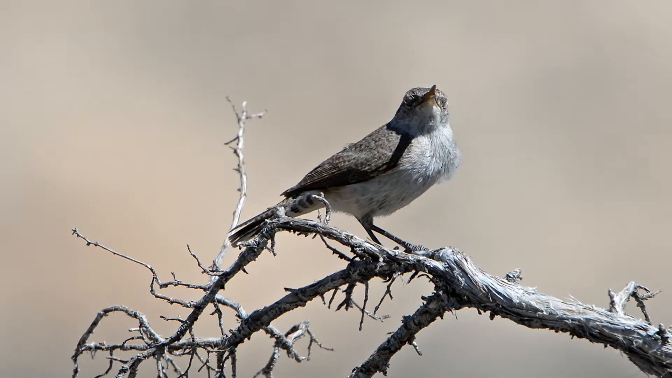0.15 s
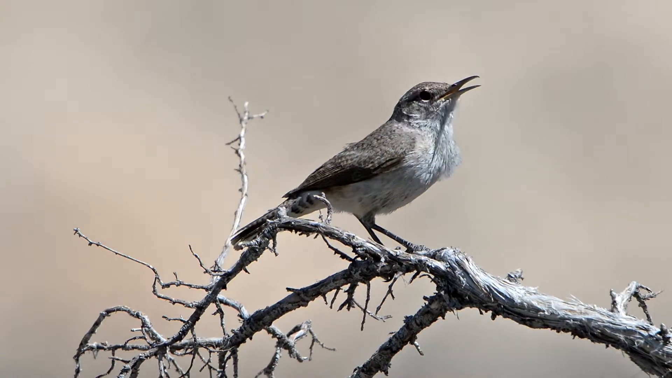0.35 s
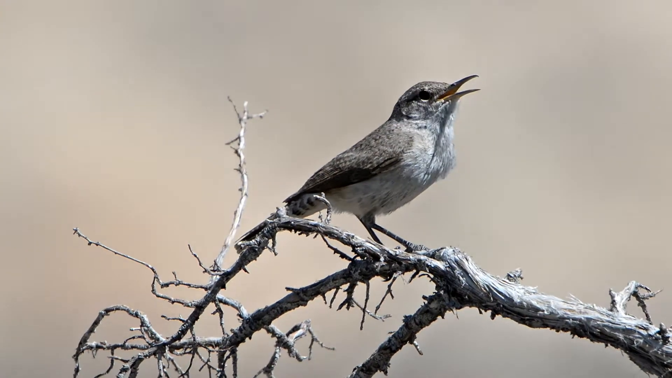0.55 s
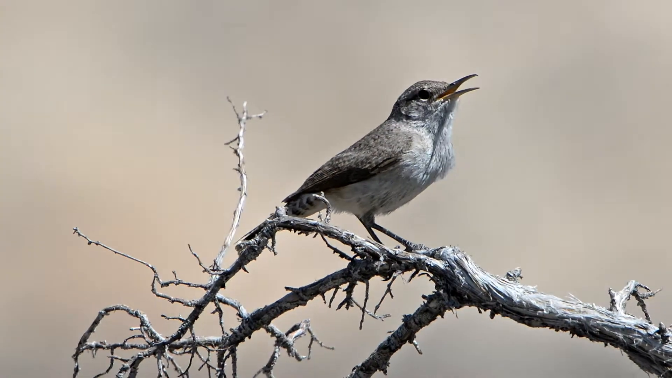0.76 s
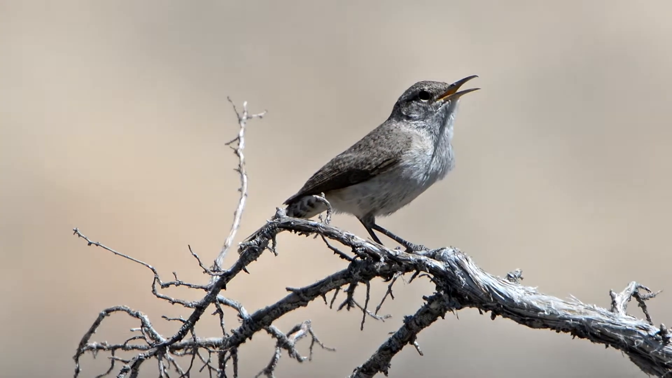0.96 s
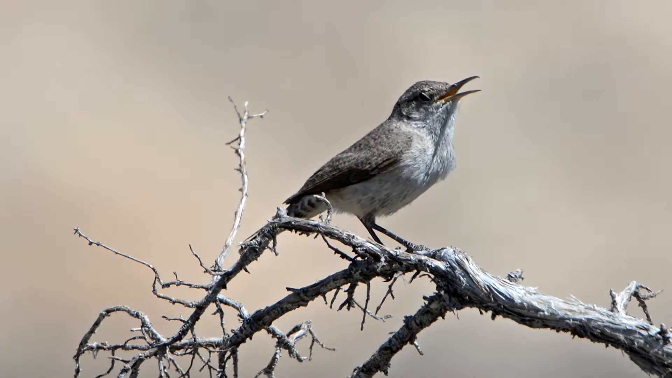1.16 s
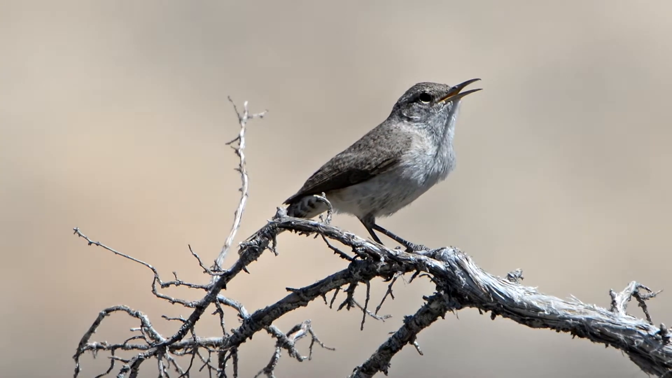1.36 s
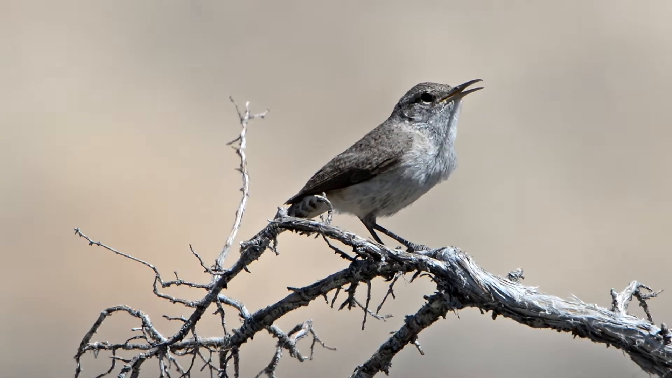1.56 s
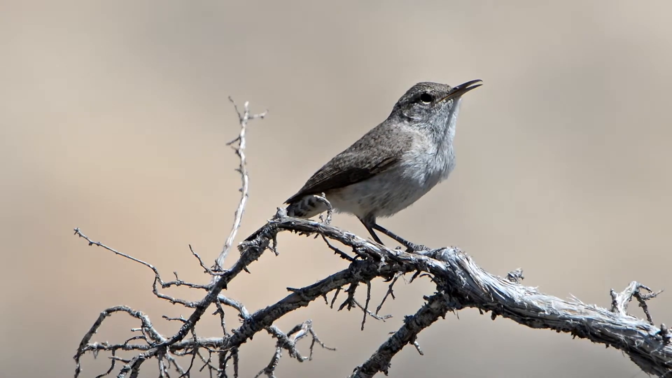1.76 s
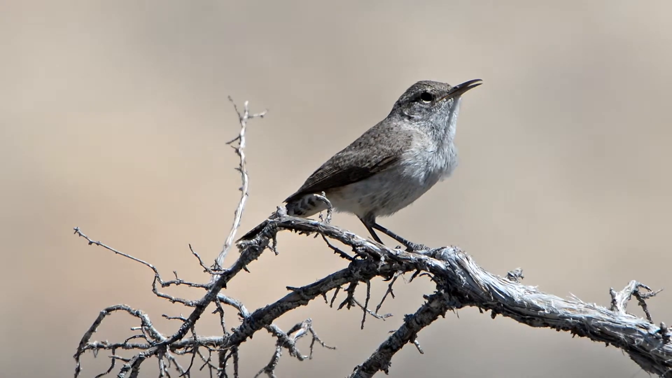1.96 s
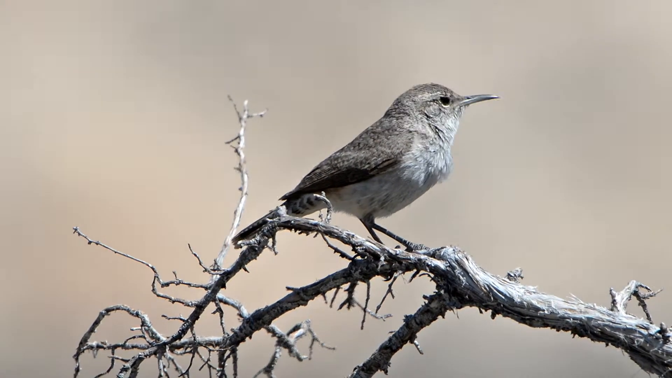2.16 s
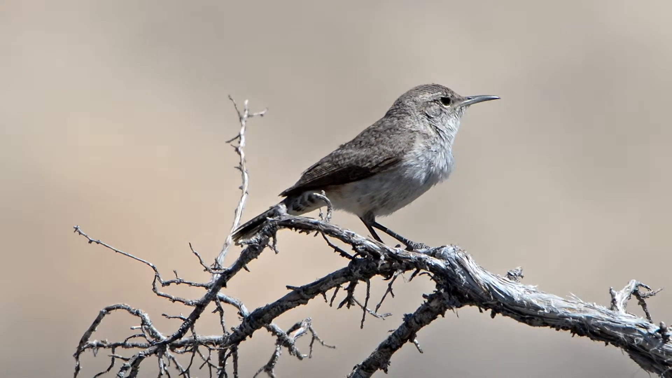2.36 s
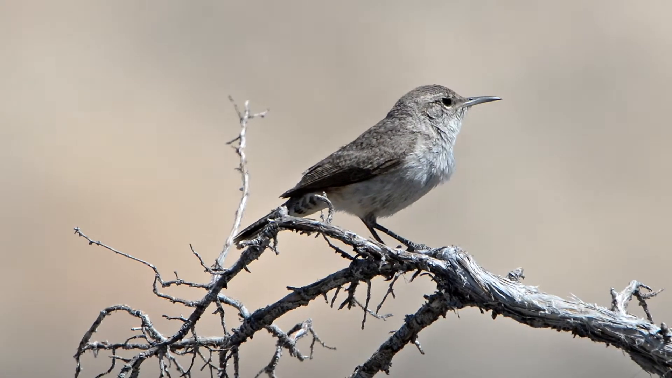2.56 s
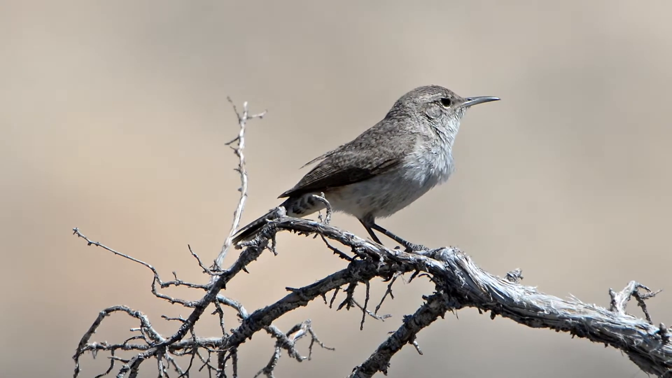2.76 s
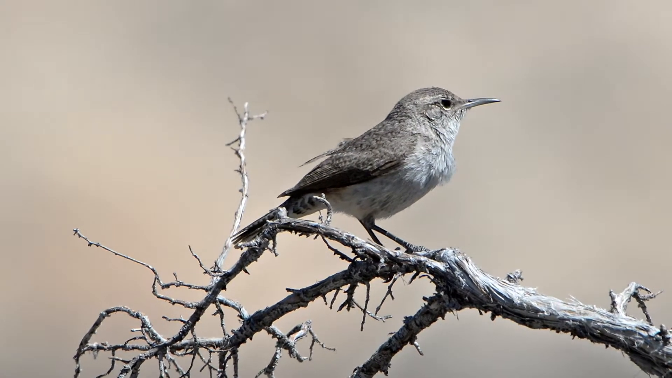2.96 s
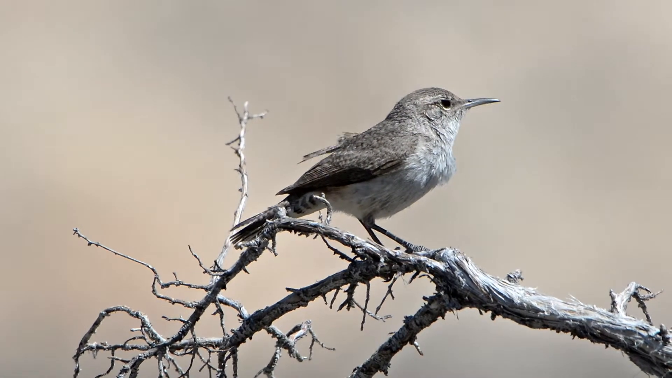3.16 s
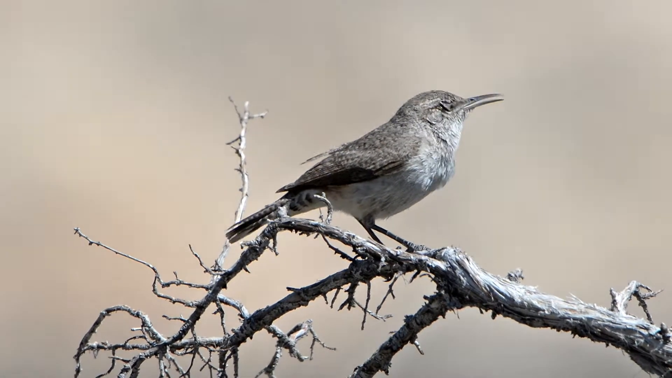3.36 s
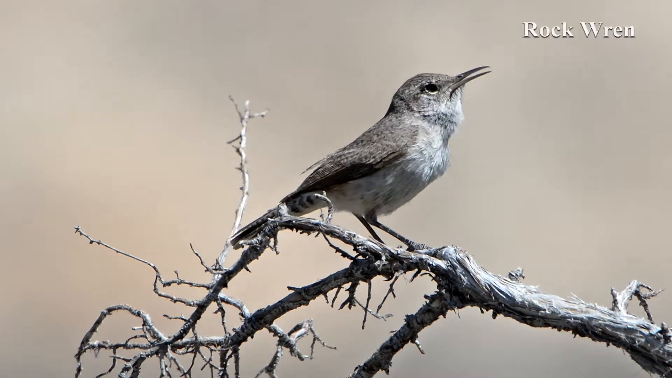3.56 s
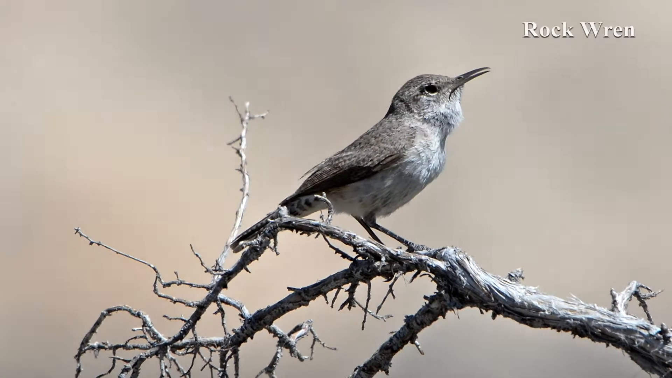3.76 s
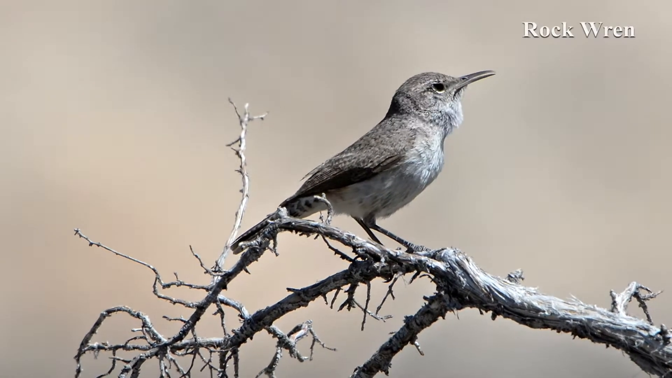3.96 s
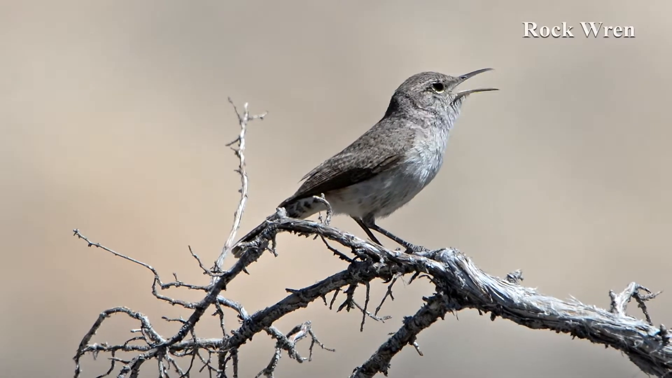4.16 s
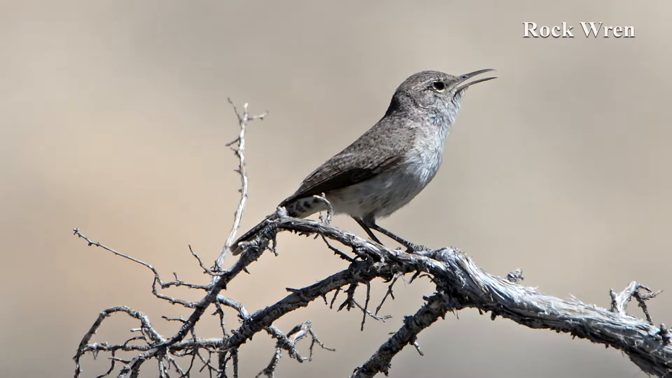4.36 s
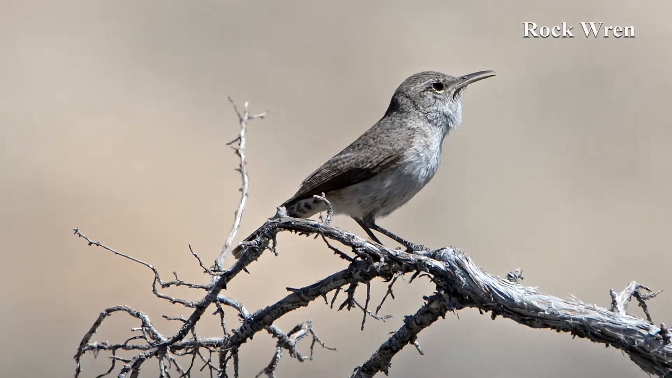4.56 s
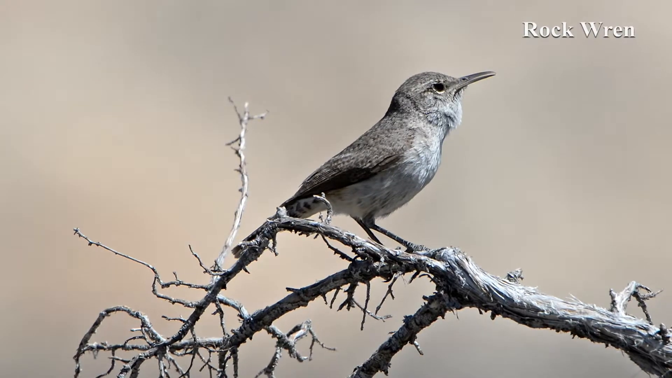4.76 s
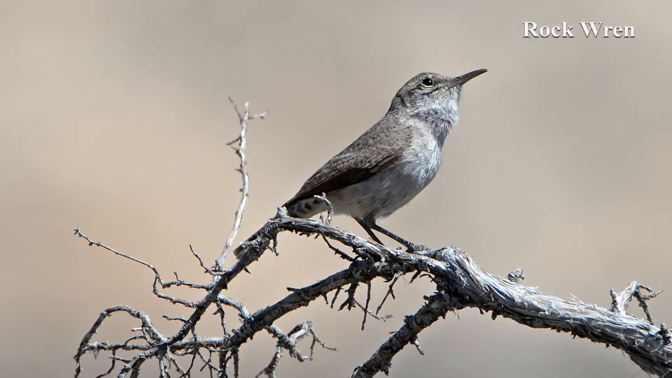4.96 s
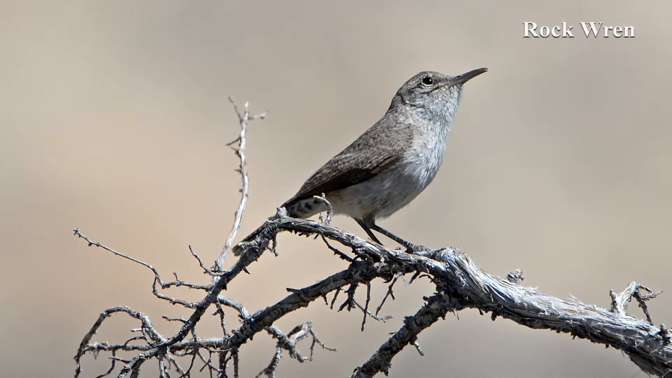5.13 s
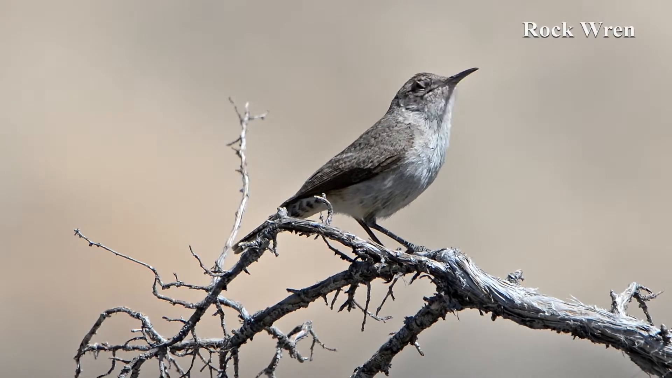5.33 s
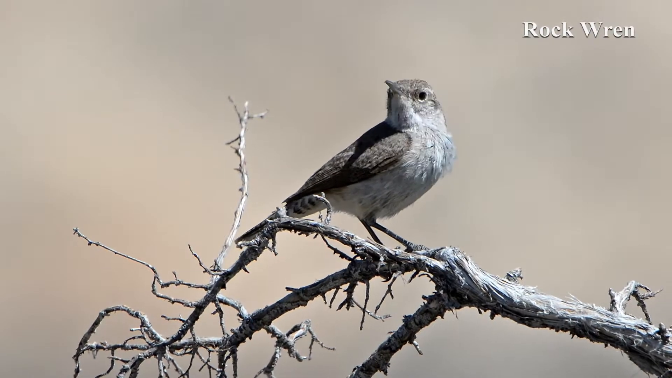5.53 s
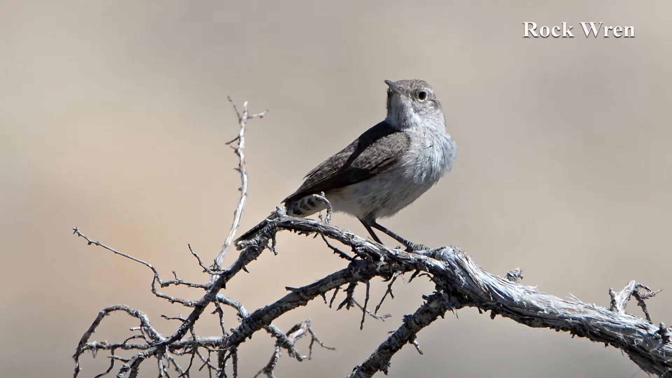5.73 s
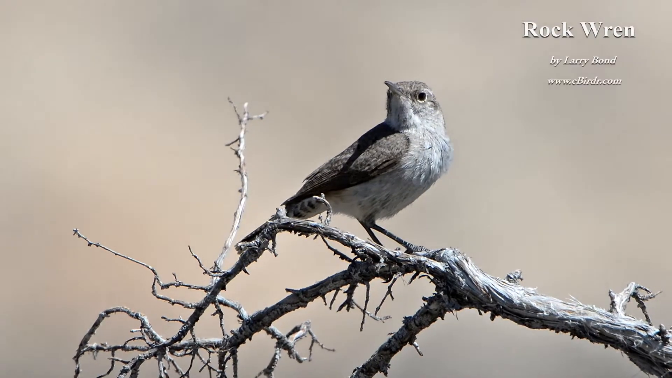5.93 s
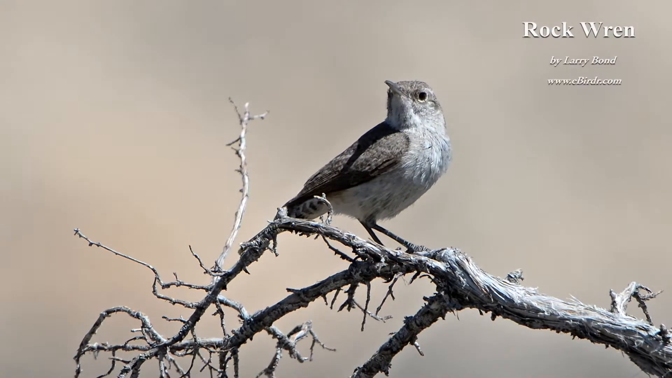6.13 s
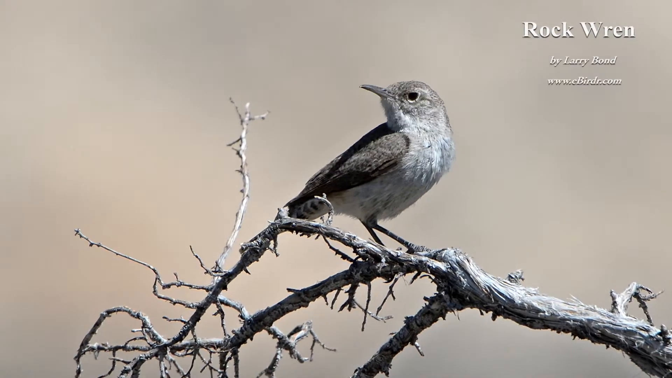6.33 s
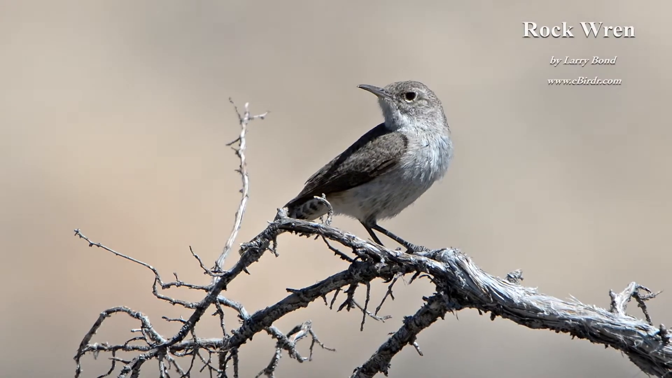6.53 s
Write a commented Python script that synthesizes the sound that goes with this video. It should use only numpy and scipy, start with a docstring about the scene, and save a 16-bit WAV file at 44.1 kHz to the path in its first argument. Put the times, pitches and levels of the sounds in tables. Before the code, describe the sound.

Close birdsong in dry open country: quick ringing trills, a short pause, then evenly spaced hoarse chips with soft whistled endings, over thin hiss.

```python
"""Over hiss, a thin whine and a breeze, a rock wren at once sings eight two-voiced trills joined by high slurs.
Its second song is seven sharp chips, each buzzing into a low whistle; a single faint peep comes from far off.
Notes are gliding phases shaped in dB, with level-dependent overtones; a filtered noise tail is the ground's echo.
Breeze, drone and hiss are coloured noise; the recorder adds a sine whine, cuts the bass and the extreme top."""
import sys
import numpy as np
from scipy import signal
from scipy.fft import rfft, irfft, next_fast_len
from scipy.io import wavfile
from scipy.ndimage import uniform_filter1d

SR = 44100
rng = np.random.default_rng(int(sys.argv[2]) if len(sys.argv) > 2 else 0)


def int16_out(signal):
    """Quantize to a 16-bit WAV file."""
    q = np.round(np.clip(np.atleast_2d(signal).T, -1, 1) * 32767)
    wavfile.write(sys.argv[1], SR, q.astype(np.int16))


N = 295029
TIME = np.arange(N) / SR


def wren():
    """Both songs of one syrinx, summed note by note."""
    song = np.zeros(N)
    for i, x in trill_song() + chip_song():
        song[i] += x
    return song


# Trills: first_beat_s, beat_s, level_db (relative, at beat 3), fade_db_per_beat, overtones_db (relative),
# trough_hz (at beat 1.75), attack_db, release_db
TRILL_NOTES = [(0.267, 0.022, -5, -1.74, 8.5, 4310, 9, 6.5), (0.4896, 0.023, -1, -0.3, 4, 4350, 10.5, 14),
               (0.7146, .024, .5, -0.3, 4.5, 4400, 8, 14), (0.9447, 0.025, 0, 0, 7, 4416, 5.5, 11),
               (1.178, .024, 1, 0.15, 3.2, 4480, 8, 15), (1.407, .024, -2.5, -0.4, 5, 4430, 5.5, 18),
               (1.648, 0.024, -7.5, -0.56, 4.5, 4470, 8.5, 9.5), (1.905, 0.023, -9, 0, 5.5, 4390, 11, 9)]
# High slurs between trills: start_s, length_s, vertex_hz, bend_hz (per length squared),
# vertex_at (share of length; above 1 = never reached), level_db
SLUR_NOTES = [(.400, 0.043, 6190, 1450, .78, -26), (0.627, 0.04, 6010, 2140, 0.71, -22),
              (.853, .043, 5890, 584, 1.2, -23.5), (1.086, 0.044, 6090, 3020, 0.65, -21.5),
              (1.31, 0.051, 5990, 430, 1.3, -24.5), (1.538, 0.057, 6100, 780, 1.25, -34),
              (1.79, 0.04, 6090, 1580, .86, -29.5)]


def trill_song():
    """First song: two-voiced trills and the slurs between them."""
    return [trill(*row) for row in TRILL_NOTES] + [slur(*row) for row in SLUR_NOTES]


TRILL_BEATS, HURRY_FROM_BEAT, HURRY_SHARE = 5.08, 3.9, 0.24


def trill(start_s, beat_s, db, fade_db, bright_db, trough_hz, attack_db, release_db, lead_beats=0.06):
    """Both sides of the syrinx at once; effort builds around the first beat and ebbs as the last beats hurry."""
    i, t, gate = span(start_s - 0.38 * beat_s, start_s + TRILL_BEATS * beat_s, edge_s=0.0055)
    at = (t - start_s) / beat_s
    effort_db = envelope(np.linspace(0, 1, len(t)), top_from=0.27, top_to=0.63,
                         rise_db=attack_db, fall_db=release_db, rise_curve=1.1, fall_curve=2.8)
    hurry = HURRY_SHARE * np.maximum(at - HURRY_FROM_BEAT, 0)
    early = lead_beats * np.clip(1 - 2 * at, 0, 1)
    at = at + hurry + early
    z = 0
    for hz, gain in swoops(at, trough_hz), strokes(at):
        hz = hz * (1 + 0.0156 * walk(89.3, len(t)))
        flicker_db = 0.61 * walk(119.4, len(t)) + 1.0 * walk(900, len(t))
        z = z + gain * undb(flicker_db) * np.exp(1j * swing(hz, jitter=0.01))
    z = z * gate * undb(effort_db + fade_db * (at - 3))
    return i, undb(db) * overtones(z, even_db=bright_db - 24.0, odd_db=bright_db - 23)


# Places are shares of the beat
SWOOP_TOP_HZ, SWOOP_TOP_AT, SWOOP_BREAK_AT, SWOOP_SHARPNESS, SWOOP_DB = 7015, 0.29, 0.41, 1.45, -19
TROUGH_CLIMB_HZ_PER_BEAT, FIRST_TROUGH_LIFT_HZ = 128.2, 664


def swoops(at, trough_hz):
    """High side: pitch arches once a beat; the tone swells through the trough and breaks just after the top."""
    arch = np.abs(np.cos(np.pi * (at - SWOOP_TOP_AT))) ** (2 * SWOOP_SHARPNESS)
    first_lift_hz = FIRST_TROUGH_LIFT_HZ * np.clip(1 - at / 0.574, 0, 1)
    low_hz = trough_hz + TROUGH_CLIMB_HZ_PER_BEAT * (at - 1.75) + first_lift_hz
    db = envelope((at - SWOOP_BREAK_AT) % 1, top_from=0.5, top_to=0.61,
                  rise_db=17.5, fall_db=31, rise_curve=3.36, fall_curve=1.19)
    return low_hz + (SWOOP_TOP_HZ - low_hz) * arch, undb(SWOOP_DB + db)


# Lead and length are shares of the beat
STROKE_FROM_HZ, STROKE_RISE_HZ, STROKE_LEAD, STROKE_LENGTH, STROKE_DB = 3330, 1668, 0.038, 0.48, -17


def strokes(at, crest=0.75, last_db=-7, skew=1.24):
    """Low side: a short rising stroke at the start of each beat, weaker on the last one."""
    p = np.clip((at + STROKE_LEAD) % 1 / STROKE_LENGTH, 0, 1)
    level_db = STROKE_DB + last_db * np.clip(at - HURRY_FROM_BEAT, 0, 1)
    gain = np.abs(np.sin(np.pi * p ** skew)) ** 1.08 * undb(level_db)
    return STROKE_FROM_HZ + STROKE_RISE_HZ * np.sin(np.pi / 2 * p / crest), gain


def slur(start_s, length_s, vertex_hz, bend_hz, vertex_at, db, loudest=0.7, octave_db=-29):
    """A thin high note on a parabolic pitch curve, with a faint octave."""
    i, t, gate = span(start_s, start_s + length_s, edge_s=0.0033)
    p = (t - start_s) / length_s
    phase = pure_phase(vertex_hz + bend_hz * (p - vertex_at) ** 2)
    swell_db = envelope(p, loudest, loudest, rise_db=22.5, fall_db=15, rise_curve=2.4, fall_curve=2.1)
    swell = gate * undb(0.29 * walk(200, len(t)) + swell_db)
    octave = undb(octave_db) * swell ** 0.5
    return i, undb(db) * (swell * np.sin(phase) + octave * np.sin(2 * phase))


# Chips: pitch_peak_s, level_db (relative), rise_s, buzz_level_db (of the buzz that follows)
CHIP_NOTES = [(3.522, -5.5, 0.034, -42.5), (3.7738, -.5, 0.032, -34.5), (4.021, 0, 0.036, -38.5),
              (4.272, .5, 0.039, -33), (4.484, .6, .039, -33.5), (4.734, 1.5, 0.036, -32.5),
              (4.984, 0.5, 0.036, -34.5)]
# Low whistles, one after each chip: start_s, length_s, pitch_hz (before scoop and fall), fall_hz,
# fall_lateness (power), level_db
WHISTLE_NOTES = [(3.616, 0.077, 2850, 674, 5.6, -25), (3.874, 0.074, 2936, 530, 5.2, -20),
                 (4.117, 0.078, 2946, 536, 2.7, -20), (4.369, 0.062, 2885, 412, 4.6, -17.5),
                 (4.59, 0.063, 2980, 548, 2.5, -18), (4.831, 0.076, 2886, 615, 2.83, -22),
                 (5.084, 0.079, 2866, 512, 2.1, -26.5)]
SCOOP_HZ, BUZZ_PULSE_HZ = 117.6, 130.3


def chip_song():
    """Second song: each chip buzzes into its whistle."""
    notes = [whistle(*row) for row in WHISTLE_NOTES]
    for (peak_s, db, rise_s, buzz_db), (start_s, _, top_hz, *_) in zip(CHIP_NOTES, WHISTLE_NOTES):
        notes.append(chip(peak_s, db, rise_s))
        notes.append(buzz(peak_s + 0.012, start_s + 0.002, top_hz - SCOOP_HZ, buzz_db))
    return notes


# Pitch: a ramp to a shoulder, a quick flick on top of it, then a sag
CHIP_FROM_HZ, CHIP_SHOULDER_HZ, CHIP_CLIMB_HZ_PER_S, CHIP_SAG_HZ_PER_S = 1770, 2877, 46000, 18900
FLICK_HZ, FLICK_UP_S, FLICK_DOWN_S, CHIP_TAIL_S = 941, 0.00386, 0.0050, 0.023
# Relative levels: first three harmonics, extra push of the flick, rasp
CHIP_HARMONICS_DB, FLICK_DB, RASP_DB = (-21, -22.5, -34), 7, -41.5
# Throat resonance: freq_hz, gain_db
THROAT_RESONANCE = [(1750, -22.5), (2400, -16.5), (3000, -4.5), (3800, -2.5), (4850, -2), (5600, -11),
                    (7000, -11.5), (11500, -48)]
# Rasp spectrum: freq_hz, density_db (relative, per Hz)
RASP_SPECTRUM = [(2500, -30), (3300, -13), (3800, 0.5), (5200, -1), (6500, -18), (8000, -21), (15000, -19)]


def chip(peak_s, db, rise_s, onset_db=24, release_db=15, purity_db=-8, dulling_db=-20):
    """A fast rise and fall, hoarse at both ends; the throat favours harmonics near 3-5 kHz."""
    i, t, gate = span(peak_s - rise_s, peak_s + CHIP_TAIL_S)
    before, after = np.maximum(peak_s - t, 0), np.maximum(t - peak_s, 0)
    flick = np.exp(-(before / FLICK_UP_S + after / FLICK_DOWN_S) ** 2)
    ramp_hz = CHIP_SHOULDER_HZ - CHIP_CLIMB_HZ_PER_S * before - CHIP_SAG_HZ_PER_S * after
    hz = np.maximum(ramp_hz, CHIP_FROM_HZ) + FLICK_HZ * flick
    onset = np.clip(1 - (1 - before / rise_s) / 0.47, 0, 1) ** 0.95
    effort_db = -onset_db * onset - release_db * (after / CHIP_TAIL_S) ** 3.3
    hoarse = np.clip(np.abs(t - peak_s + 0.004) / 0.03, 0, 1) ** 3.5
    phase = swing(hz * (1 + 0.014 * walk(133, len(t))), jitter=0.0041 + 0.045 * hoarse)
    # the flick pushes the fundamental; from there on the tone is purer and its overtones die first
    pure_db = purity_db * np.where(t < peak_s, flick, 1)
    throat_hz, throat_db = np.transpose(THROAT_RESONANCE)
    z = 0
    for k, harmonic_db in enumerate(CHIP_HARMONICS_DB, 1):
        push_db = FLICK_DB * flick if k == 1 else pure_db + dulling_db * after / CHIP_TAIL_S
        level_db = db + effort_db + harmonic_db + push_db + np.interp(k * hz, throat_hz, throat_db)
        z = z + undb(level_db + walk(373, len(t))) * np.exp(1j * k * phase)
    rasp = undb(db + RASP_DB + 0.35 * effort_db + 1.2 * pure_db) * noise(RASP_SPECTRUM)[i]
    return i, gate * (overtones(z, even_db=-49, odd_db=-27) + rasp)


def buzz(start_s, end_s, end_hz, db, sweep_hz=600):
    """Soft rapid pulses, each sweeping upward, that run into the whistle."""
    i, t, gate = span(start_s, end_s)
    pulse_hz = BUZZ_PULSE_HZ * (1 + 0.11 * walk(90, len(t)))
    share = np.cumsum(pulse_hz) / SR % 1
    progress = (t - start_s) / (end_s - start_s)
    hz = end_hz - 250 * (1 - progress) ** 2 + sweep_hz * (share - 0.5)
    swell_db = db - 8 * np.clip(1 - 2 * progress, 0, 1) + 1.7 * walk(106, len(t))
    pulses = np.sin(np.pi * share) ** 4
    return i, gate * undb(swell_db) * pulses * np.sin(swing(hz, jitter=0.015))


def whistle(start_s, length_s, top_hz, fall_hz, lateness, db,
            loudest=0.65, octave_db=-34, opening_db=32, flutter=0.25):
    """A pure low note that swells as the buzz's flutter dies out; its octave emerges towards the loudest point."""
    i, t, gate = span(start_s, start_s + length_s, edge_s=0.0037)
    p = (t - start_s) / length_s
    hz = top_hz - SCOOP_HZ * (1 - p) ** 2 - fall_hz * np.abs(p) ** lateness
    phase = pure_phase(hz)
    early = np.clip(1 - p / loudest, 0, 1)
    swell_db = envelope(p, loudest, loudest, rise_db=16.5, fall_db=15.0, rise_curve=1.43, fall_curve=1.95)
    swell = gate * undb(1.1 * walk(200, len(t)) + swell_db)
    flutter_depth = np.tanh(flutter * early ** 2)
    swell = swell * (1 + flutter_depth * np.sin(2 * np.pi * BUZZ_PULSE_HZ * (t - start_s)))
    octave = undb(octave_db - opening_db * early) * swell ** 0.17
    return i, undb(db) * (swell * np.sin(phase) + octave * np.sin(2 * phase))


def ground(x, scatter_db, t60_s, delay_s):
    """Rocks and scrub scatter a faint, short echo: decaying noise, low-passed so it is duller than the song."""
    t = TIME[:SR // 2]
    scatter = rng.standard_normal(len(t)) * undb(-60 * t / t60_s) * (t > delay_s)
    scatter = scatter / np.linalg.norm(scatter)
    scatter = signal.sosfilt(signal.butter(2, 4500, fs=SR, output="sos"), scatter)
    return undb(scatter_db) * signal.fftconvolve(x, scatter)[:N]


# Peep: start_s, length_s, vertex_hz, bend_hz (per length squared), vertex_at (share of length), level_db
PEEP_NOTE = (5.795, .065, 8402, -250, 1.5, -57)


def far_peep():
    """One faint peep from far off, built as a slur."""
    peep = np.zeros(N)
    i, x = slur(*PEEP_NOTE)
    peep[i] = x
    return peep


# Brush spectrum: freq_hz, density_db (relative, per Hz)
BRUSH_SPECTRUM = [(30, -11), (120, -4.5), (300, -2.5), (1000, -2.5), (1550, 0.5), (1950, -3), (2500, -7),
                  (3200, -13), (4500, -21), (9000, -41.5)]
# Gusts: crest_s, half_length_s, level_db (before breeze_db), brightness_db
BRUSH_GUSTS = [(2.11, 0.34, -53.5, 1), (2.695, 0.16, -45, 0.5), (3.244, 0.25, -55, 7),
               (4.358, 0.48, -49, -1.5), (5.747, 0.47, -47, -6), (6.25, 0.47, -49, -2)]
CALM_DB = -56.5  # before breeze_db


def breeze(breeze_db=4.0):
    """Air in dry brush: gusts swell and die over a calm, each with its own brightness."""
    body_power = treble_power = undb(CALM_DB) ** 2
    for crest_s, half_length_s, db, bright_db in BRUSH_GUSTS:
        power = undb(db) ** 2 / (1 + ((TIME - crest_s) / half_length_s) ** 2 / 2) ** 2
        body_power = body_power + power
        treble_power = treble_power + power * undb(bright_db) ** 2
    air = noise(BRUSH_SPECTRUM)
    treble = signal.sosfiltfilt(signal.butter(2, 2200, "high", fs=SR, output="sos"), air)
    body = (air - treble) * np.sqrt(body_power) * undb(1.1 * walk(14, N))
    treble = treble * np.sqrt(treble_power) * undb(0.78 * walk(11, N))
    return undb(breeze_db) * (body + treble)


# Drone spectrum: freq_hz, density_db (relative, per Hz)
DRONE_SPECTRUM = [(30, -17.5), (130, -9.5), (220, 4), (320, -9.5), (560, -10), (615, 2), (680, -11.5),
                  (1500, -23), (1860, -18.5), (1935, 0), (2010, -12.5), (2600, -41)]


def drone(level_db=-50.5):
    """A faint far drone: steady noise with narrow spectral peaks."""
    return undb(level_db) * noise(DRONE_SPECTRUM)


# Hiss spectrum: freq_hz, density_db (relative, per Hz)
HISS_SPECTRUM = [(1000, -1.3), (4000, -0.24), (6000, 0.78), (9000, 0.4), (12000, 0.031), (15500, -1.2)]
WHINE_HZ = 15653


def electronics(hiss_db=-53.5, side_db=-4, whine_db=-59.5):
    """Even preamplifier hiss, partly different in each ear, and a thin steady whine."""
    side = noise(HISS_SPECTRUM) * np.array([[1], [-1]])
    hiss = noise(HISS_SPECTRUM) + undb(side_db) * side
    return undb(hiss_db) * hiss + undb(whine_db) * np.sin(2 * np.pi * WHINE_HZ * TIME)


def undb(db):
    """Decibels to gain."""
    return 10 ** (np.asarray(db) / 20)


def walk(rate_hz, size):
    """Smooth chance with a spread near 1: random steps, averaged twice."""
    k = max(2, int(SR / rate_hz))
    steps = np.repeat(rng.standard_normal(size // k + 1), k)
    return 1.5 * uniform_filter1d(uniform_filter1d(steps, k), k)[:size]


def noise(spectrum):
    """Noise of rms 1 with the given colour."""
    hz, db = np.transpose(spectrum)
    gain = undb(np.interp(np.log(np.fft.rfftfreq(N, 1 / SR) + 1), np.log(hz), db))
    x = irfft(rfft(rng.standard_normal(N)) * gain, N)
    return x / x.std()


def span(start_s, end_s, edge_s=0.0012):
    """Sample numbers and times of a note, and a gate with soft edges."""
    i = np.arange(int(start_s * SR), int(end_s * SR))
    t = i / SR
    to_edge_s = np.minimum(t - start_s, end_s - t)
    return i, t, np.sin(np.pi / 2 * np.clip(to_edge_s / edge_s, 0, 1)) ** 2


def envelope(p, top_from, top_to, rise_db, fall_db, rise_curve=1.0, fall_curve=1.0):
    """Attack, hold and release in dB over the progress 0-1 of a note."""
    rise = np.clip(1 - p / top_from, 0, 1)
    fall = np.clip((p - top_to) / max(1 - top_to, 1e-3), 0, 1)
    return -rise_db * rise ** rise_curve - fall_db * fall ** fall_curve


def swing(hz, jitter):
    """Phase of a vibrating membrane whose pitch glides smoothly and trembles a little."""
    hz = uniform_filter1d(hz, size=60) * (1 + jitter * walk(900, len(hz)))
    return 2 * np.pi * np.cumsum(hz) / SR


WAVER, TREMBLE = 0.0035, 0.004  # shares of the pitch


def pure_phase(hz):
    """Phase of a whistled note: the pitch wavers and trembles only slightly."""
    return swing(hz * (1 + WAVER * walk(121, len(hz))), jitter=TREMBLE)


def overtones(z, even_db, odd_db):
    """The membranes swing unevenly when driven hard: overtones and sum tones grow with loudness."""
    turn = z / (np.abs(z) + 1e-9)
    added = undb(even_db) * turn + undb(odd_db) * turn ** 2
    return (z + np.abs(z) ** 0.5 * z * added).imag


def scene():
    """The bird straight ahead, near and far echoes, the peep, the breeze, the drone and the hiss."""
    song = wren()
    near_echo = ground(song, scatter_db=-18.0, t60_s=0.092, delay_s=0.0087)
    far_echo = ground(song, scatter_db=-27.0, t60_s=0.4, delay_s=0.031)
    return song + near_echo + far_echo + far_peep() + breeze() + drone() + electronics()


LOW_CUT_HZ, TOP_HZ = 1475, 15740


def record(dry, bass_db=-48):
    """A steep low cut leaves only a trace of the bass; the top is cut off too."""
    padded = np.pad(dry, ((0, 0), (SR // 4, SR // 4)), mode="reflect")
    size = next_fast_len(padded.shape[1])
    hz = np.fft.rfftfreq(size, 1 / SR)
    low_cut = np.maximum(undb(bass_db), np.minimum(hz / LOW_CUT_HZ, 1) ** 64)
    high_cut = undb(np.interp(hz, [TOP_HZ, TOP_HZ + 200], [0, -60]))
    return irfft(rfft(padded, size) * low_cut * high_cut, size)[:, SR // 4:SR // 4 + N]


dry = scene()
out = record(dry)
int16_out(out)
```